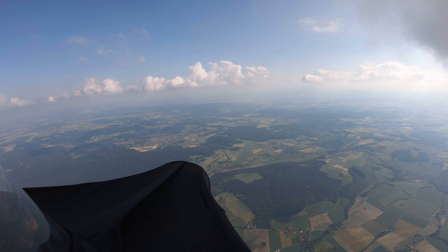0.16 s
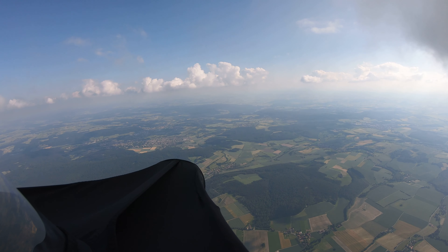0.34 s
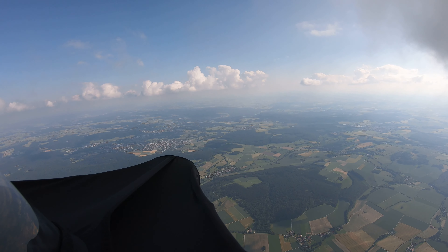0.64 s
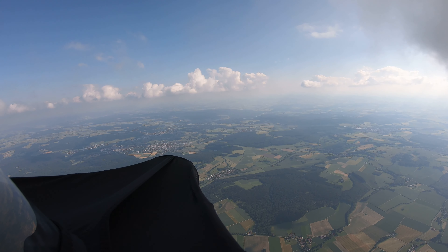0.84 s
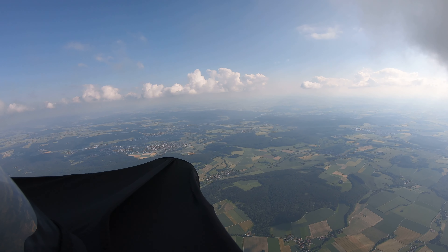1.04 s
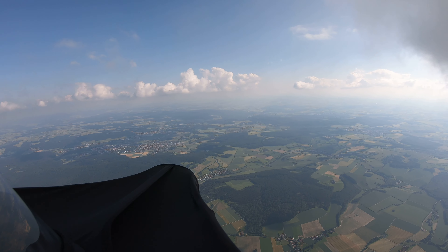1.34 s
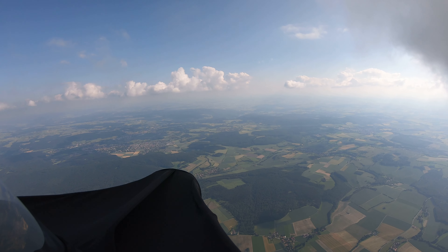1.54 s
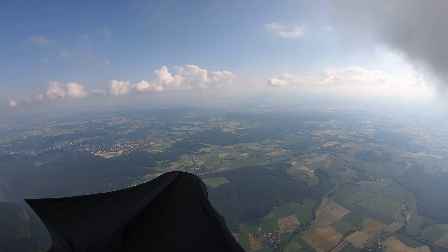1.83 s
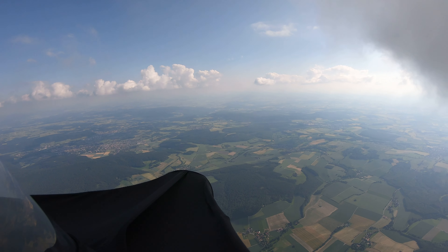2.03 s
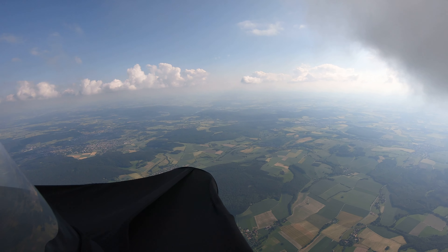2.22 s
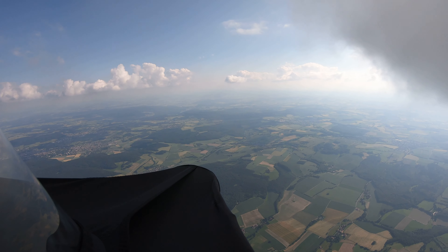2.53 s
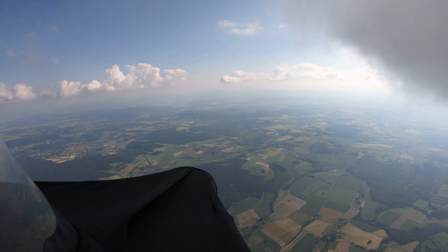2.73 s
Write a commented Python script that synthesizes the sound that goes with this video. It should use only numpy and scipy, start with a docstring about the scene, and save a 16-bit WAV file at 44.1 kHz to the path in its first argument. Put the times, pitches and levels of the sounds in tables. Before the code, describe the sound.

Wind rumbles unevenly against a small camera microphone in gliding flight, deep and close, with faint roar and dull hiss above. Flutter and small ticks lead to a strong gust at 0.6-0.8 s, a dense burst of thudding pops, with a barely audible rising whistle near 0.9 s. It eases around 1.2-1.6 s, then buffets again near 1.85 and 2.1 s, continuing as softer lumpy rumble to the end.

```python
"""A lumpy wind rumble with buffets and pops, under roar and hiss, at a small camera microphone in gliding flight.
Large eddies push the capsule, smaller ones buffet and pop across the port, and air roars round the housing.
Each airflow band is noise mixed with eddy impulses, filtered to a spectrum and swelled by a level curve.
Pops and ticks are short wave packets; a faint whistle is narrow noise on a gliding pitch."""
import sys
import numpy as np
from scipy import signal
from scipy.fft import rfft, irfft
from scipy.io import wavfile
from scipy.ndimage import uniform_filter1d

SR = 44100
rng = np.random.default_rng(int(sys.argv[2]) if len(sys.argv) > 2 else 0)


def store_wav(level_fs):
    """Save 16-bit WAV to argv[1]."""
    pcm = np.round(np.clip(np.atleast_2d(level_fs), -1, 1) * 32767)
    wavfile.write(sys.argv[1], SR, pcm.T.astype(np.int16))


N = 126567


def gain_of(db):
    """Decibel law: 20 dB is a tenfold amplitude."""
    return 10 ** (np.asarray(db) / 20)


def evened(x):
    """Normalisation: scales a signal to an rms of 1."""
    return x / np.sqrt(np.mean(x ** 2) + 1e-20)


def curve(table, column):
    """Linear interpolation: one column of a table of times, at every sample."""
    rows = np.array(table)
    return np.interp(np.arange(N) / SR, rows[:, 0], rows[:, column])


def coloured(x, spectrum):
    """Spectral shaping: weights each frequency by a table, at -120 dB outside it."""
    hz = np.fft.rfftfreq(N, 1 / SR)
    table_hz, table_db = np.transpose(spectrum)
    shape_db = np.interp(np.log(hz + 1), np.log(table_hz + 1), table_db, left=-120, right=-120)
    return evened(irfft(rfft(x) * gain_of(shape_db), N))


def lumps(per_s):
    """Random modulation: low-passed noise of rms 1, changing up to about per_s times a second."""
    hz = np.fft.rfftfreq(N, 1 / SR)
    low_pass = np.exp(-(hz / per_s) ** 2)
    tilt = hz / (hz + 5) / np.sqrt(hz + 5)  # removes the mean and favours slow changes
    return evened(irfft(rfft(rng.standard_normal(N)) * low_pass * tilt, N))


def eddy_train(per_s, spread_db):
    """Shot noise: sparse random suction impulses, uneven in size by spread_db."""
    size = gain_of(spread_db * np.minimum(rng.exponential(1, N), 4))
    return evened(-size * (rng.random(N) < per_s / SR))


def steadied(x, amount):
    """Gain control: evens out the chance swells of a narrow noise."""
    span = int(0.03 * SR)  # 30 ms, averaged twice
    power = uniform_filter1d(uniform_filter1d(x ** 2, span), span)
    return x / (abs(power) + 0.037) ** (amount / 2)


def airflow(spectrum, level_db, lumps_db, eddies, share, steady=0.):
    """Turbulence noise: noise plus eddy impulses, coloured, made lumpy and set to its level."""
    noise = np.sqrt(1 - min(share, 1) ** 2) * rng.standard_normal(N)
    band = coloured(noise + share * eddies, spectrum)
    lumpy = steadied(band, steady) * gain_of(lumps_db)
    return gain_of(level_db) * evened(lumpy)


def bursts(table):
    """Transient pressure pulses: each row is a Gaussian wave packet centred on a suction."""
    out, t = np.zeros(N), np.arange(N) / SR
    for centre_s, peak_db, hz, cycles in table:
        phase = (t - centre_s) * hz  # in cycles
        envelope = np.exp(-2 * (phase / cycles) ** 2)
        out -= gain_of(peak_db) * envelope * np.cos(2 * np.pi * phase)
    return out


# Relative spectra of the airflow noise, from treble to middle.
# Each row: frequency in Hz, density in dB per Hz.
HISS_SPECTRUM = [(4800, -18), (5800, -0.5), (6500, -2.5), (7500, -2.5), (8300, -5), (9000, -11.5),
                 (9800, -23.5), (10500, -35)]
FIZZ_SPECTRUM = [(1900, -26), (2500, -2.5), (3100, 0), (4300, -1.5), (5000, -6.5), (5700, -18),
                 (6500, -37.5)]
ROAR_SPECTRUM = [(900, -25), (1400, -5), (2000, -4.5), (2600, -9.5), (3200, -22.5), (4000, -34)]
RUSH_SPECTRUM = [(450, -5.5), (700, -5), (1000, -3), (1330, 1.5), (1420, -20), (1700, -50)]
SPRAY_SPECTRUM = [(450, -14.5), (700, 0), (1000, -5), (1400, -12), (2000, -20.5), (2800, -26.5),
                  (4000, -52)]
# Strength of the hiss. Each row: time in seconds, level in dB.
HISS_LEVEL_DB = [(0.05, -68.5), (1.57, -71), (1.75, -67.5), (1.82, -72), (2.42, -74), (2.86, -71),
                 (2.87, -80)]
# Strength of the rush. Each row: time in seconds, level in dB.
RUSH_LEVEL_DB = [(0, -49.5), (.6, -50), (.9, -50.5), (1.3, -54), (1.8, -49), (2.3, -52.5), (2.87, -57.5)]
# Strength of three bands. Each row: time in seconds, spray in dB, roar in dB, fizz in dB.
STREAM_LEVELS_DB = [(0.0, -41, -51, -58), (0.01, -51, -53.5, -53), (0.07, -47, -54.5, -59),
                    (0.45, -47, -53, -52.5), (0.49, -46, -55.5, -57.5), (0.65, -41.5, -47.5, -48.5),
                    (0.69, -32, -52, -52), (0.7, -38, -42.5, -44), (0.73, -39, -48, -50),
                    (0.8, -49, -50.5, -56), (0.81, -38, -56, -57.5), (0.89, -51, -55.5, -57.5),
                    (0.91, -42, -50, -55), (0.97, -47, -66, -58), (1.03, -39, -53, -53),
                    (1.06, -46.5, -59, -58.5), (1.07, -36, -60, -56), (1.1, -54, -57, -59),
                    (1.11, -41, -56, -56), (1.14, -54, -57, -57), (1.74, -50, -50, -52.5),
                    (1.76, -49, -51, -50), (1.79, -42, -50, -52.5), (1.82, -45, -54, -50),
                    (1.84, -40, -51, -54), (1.85, -43, -45, -53), (1.9, -41, -52, -52.5),
                    (2.02, -51, -52, -56), (2.07, -41.5, -51.5, -55.5), (2.21, -48, -54, -56),
                    (2.23, -46, -47, -54.5), (2.29, -48.5, -55, -55), (2.38, -45, -52, -57),
                    (2.41, -50.5, -56, -58), (2.57, -51, -52.5, -53), (2.61, -46.5, -51.5, -57),
                    (2.64, -62, -57, -56.5), (2.67, -46, -55.5, -54.5), (2.83, -44.5, -50.5, -52.5),
                    (2.87, -47, -51, -55)]


def housing_airflow(shared, eddies):
    """Broadband flow noise: the upper bands flicker with the fast turbulence by different amounts."""
    flicker, fine = lumps(per_s=220), eddy_train(per_s=270, spread_db=0.9)
    hiss = airflow(HISS_SPECTRUM, curve(HISS_LEVEL_DB, column=1),
                   0.8 * flicker + 0.97 * lumps(per_s=40), fine, share=0.15)
    fizz = airflow(FIZZ_SPECTRUM, curve(STREAM_LEVELS_DB, column=3),
                   0.42 * flicker + 0.74 * lumps(per_s=69), fine, share=0.54)
    roar = airflow(ROAR_SPECTRUM, curve(STREAM_LEVELS_DB, column=2),
                   0.11 * shared + 0.83 * flicker, fine, share=0.25)
    rush = airflow(RUSH_SPECTRUM, curve(RUSH_LEVEL_DB, column=1),
                   0.2 * shared + 0.52 * lumps(per_s=120), eddies, share=0.11)
    spray = airflow(SPRAY_SPECTRUM, curve(STREAM_LEVELS_DB, column=1),
                    1.4 * shared + 0.68 * flicker, eddies, share=0.2)
    return hiss + fizz + roar + rush + spray


# A faint fuzzy whistle as the strongest gust leaves the port.
# Each row: time in seconds, pitch in Hz, level in dB.
WHISTLE_GLIDE = [(.80, 380, -52), (.85, 469.5, -49), (.87, 480.4, -44), (.915, 519.5, -37.5),
                 (.924, 513, -61), (.926, 691, -58), (.935, 756, -49), (.955, 802, -36.5), (.98, 832, -59),
                 (.99, 850, -60)]


def whistle():
    """Frequency shifting: low-passed complex noise rides on a gliding carrier."""
    pole = np.exp(-np.pi * 38 / SR)  # each of the two poles is 38 Hz wide
    real, imaginary = rng.standard_normal((2, N))
    fuzz = real + 1j * imaginary
    for _ in range(2):
        fuzz = signal.lfilter([1 - pole], [1, -pole], fuzz)
    carrier = np.exp(2j * np.pi * np.cumsum(curve(WHISTLE_GLIDE, column=1)) / SR)
    return gain_of(curve(WHISTLE_GLIDE, column=2)) * evened((fuzz * carrier).real)


# Small ticks, mostly in the treble.
# Each row: centre in seconds, peak in dB, pitch in Hz, length in cycles.
TICK_EVENTS = [(.388, -41, 3460, 0.71), (.457, -30.5, 3200, 0.73), (.527, -38, 3350, 0.88),
               (.545, -32, 3960, 1.2), (.618, -33, 3900, 1.8), (.701, -26.5, 3200, 3.2),
               (1.02, -31, 2190, 0.6), (1.788, -31, 1530, 1.4), (1.846, -33, 1330, 1.1),
               (1.862, -33, 2100, 1.6), (2.034, -40.5, 3170, 3.6), (2.2005, -49, 6600, 3.6),
               (2.2345, -34, 3380, 0.89)]


def ticks():
    """Short transients: a packet of few cycles spreads over a wide band and is heard as a tick."""
    return bursts(TICK_EVENTS)


# Single eddies that pop on the port.
# Each row: centre in seconds, peak in dB, pitch in Hz, length in cycles.
POP_EVENTS = [(.128, -20, 507, 0.59), (.309, -22, 630, 1.4), (.547, -18, 560, 0.69),
              (.576, -22.5, 400, 0.99), (.608, -16.5, 400, 1.03), (.615, -9, 250, 0.72),
              (.653, -22, 600, 1), (.6835, -9.5, 330, 0.6), (.697, -25, 900, 1.2), (.711, -27.5, 990, 1.9),
              (.7015, -8, 190, 0.9), (.7175, -9, 200, 0.64), (.7275, -10.5, 480, 0.58),
              (.7405, -9.5, 330, 0.73), (.746, -14.5, 600, 0.89), (.762, -9.5, 220, 0.56),
              (.777, -15, 500, 0.88), (.806, -15, 400, 1.06), (.828, -26, 900, 1.5), (.860, -20, 600, 0.99),
              (.937, -29, 760, 2.1), (.994, -17.5, 600, 0.59), (1.073, -25.5, 600, 0.38),
              (1.107, -23, 450, 0.52), (1.116, -31, 950, 1.5), (1.322, -31, 480, 1.3),
              (1.655, -27.5, 400, 1), (1.766, -26.5, 650, 0.63), (1.8375, -21.5, 620, 3),
              (1.840, -18, 317, 0.67), (1.8435, -13.5, 300, 0.58), (2.074, -23, 480, 0.72),
              (2.087, -19, 350, 0.33), (2.097, -25, 300, 0.98), (2.118, -14, 240, 0.85),
              (2.228, -35.5, 750, 4.1), (2.329, -29, 300, 0.59), (2.515, -22, 453, 0.5)]


def pops():
    """Eddy suction: each passing eddy pulls on the port in a brief low packet."""
    return bursts(POP_EVENTS)


# Relative spectra of the low bands. Each row: frequency in Hz, density in dB per Hz.
FLUTTER_SPECTRUM = [(150, -35), (260, -1), (422, -6), (553, -10), (748, -21), (1000, -27), (1400, -33.5),
                    (2000, -41.5), (4300, -51), (5500, -55.5), (6500, -120)]
BUFFET_SPECTRUM = [(53, -42.5), (90, -11.5), (130, 1), (320, -17.5), (420, -39), (700, -120)]
RUMBLE_SPECTRUM = [(7.1, -40), (12, -6), (54, 6.5), (97, 0.5), (130, -10.5), (170, -36.5), (290, -120)]
# Strength of the flutter. Each row: time in seconds, level in dB.
FLUTTER_LEVEL_DB = [(0, -34.5), (.1, -38), (.13, -36), (.17, -39), (.24, -33), (.29, -37.5), (.44, -36.5),
                    (.51, -41), (.55, -36), (.59, -41), (.61, -29), (.65, -27.5), (.7, -24.5), (.76, -27),
                    (.81, -25), (.84, -39.5), (.88, -40.5), (.97, -50), (1.0, -36), (1.07, -34.5),
                    (1.12, -42.5), (1.16, -44.5), (1.29, -46.5), (1.37, -45.5), (1.4, -36), (1.44, -44.5),
                    (1.57, -48), (1.64, -45), (1.73, -44.5), (1.77, -35.5), (1.82, -36), (1.85, -32),
                    (1.92, -36), (2.02, -43), (2.09, -32.5), (2.16, -33.5), (2.21, -42), (2.25, -36),
                    (2.35, -40), (2.45, -39.5), (2.52, -37), (2.6, -40.5), (2.68, -41), (2.72, -36),
                    (2.8, -38), (2.87, -35.5)]
# Strength of the buffeting gusts. Each row: time in seconds, level in dB.
BUFFET_LEVEL_DB = [(0.0, -29.5), (0.04, -26), (0.11, -38.5), (0.13, -28.5), (0.25, -27), (0.28, -35),
                   (0.33, -27), (0.52, -31), (0.55, -25), (0.58, -28.5), (0.61, -18), (0.65, -21),
                   (0.71, -14), (0.8, -27.5), (0.84, -26.5), (0.87, -41), (1.08, -24), (1.15, -33.5),
                   (1.3, -36), (1.34, -45), (1.37, -38), (1.41, -27), (1.43, -42), (1.57, -31.5),
                   (1.64, -37), (1.77, -25.5), (1.8, -33.5), (1.84, -21.5), (1.86, -27), (1.98, -31),
                   (2.04, -41), (2.08, -25.5), (2.12, -27), (2.19, -32), (2.25, -24.5), (2.3, -31),
                   (2.32, -28.5), (2.49, -31.5), (2.57, -28.5), (2.58, -24.5), (2.68, -35), (2.72, -24),
                   (2.79, -25), (2.87, -27.5)]
# Strength of the rumble. Each row: time in seconds, level in dB.
RUMBLE_LEVEL_DB = [(0.0, -24.5), (0.08, -28), (0.45, -20), (0.47, -34), (0.49, -20.5), (0.69, -18),
                   (0.71, -15.5), (0.77, -28), (0.79, -28), (0.99, -28.5), (1.03, -19.5), (1.15, -26.5),
                   (1.19, -24), (1.37, -29), (1.41, -20), (1.46, -29.5), (1.59, -27.5), (1.61, -19.5),
                   (1.65, -43.5), (1.71, -15.5), (1.74, -38), (1.77, -20), (1.81, -30), (1.85, -18),
                   (1.96, -28), (2.05, -28.5), (2.07, -18.5), (2.1, -29), (2.29, -26), (2.45, -29),
                   (2.53, -23.5), (2.57, -27), (2.59, -22), (2.67, -27.5), (2.85, -26), (2.87, -45)]


def eddy_pressure(shared, eddies):
    """Turbulent pressure: large eddies rumble on the capsule, smaller ones buffet and flutter."""
    flutter = airflow(FLUTTER_SPECTRUM, curve(FLUTTER_LEVEL_DB, column=1),
                      2.3 * shared + 0.9 * lumps(per_s=66), eddies, share=0.098, steady=0.45)
    buffet = airflow(BUFFET_SPECTRUM, curve(BUFFET_LEVEL_DB, column=1),
                     1.7 * shared + 0.69 * lumps(per_s=90), eddies, share=0.25, steady=0.53)
    rumble = airflow(RUMBLE_SPECTRUM, curve(RUMBLE_LEVEL_DB, column=1),
                     0.1 * shared + 1.0 * lumps(per_s=8), eddies, share=0.2, steady=0.95)
    return flutter + buffet + rumble


def scene():
    """Superposition: all pressures add at one microphone, and the bands share one turbulence."""
    shared, eddies = lumps(per_s=36), eddy_train(per_s=68, spread_db=5.2)
    flow = housing_airflow(shared, eddies) + eddy_pressure(shared, eddies)
    return (flow + whistle() + ticks() + pops())[None]


def record(dry):
    """Saturation and band limiting: the capsule rounds strong pushes, the recorder cuts the top."""
    overload, edge_hz = 0.7, 10600  # overload is the ceiling, in full scale
    rounded = overload * np.tanh(dry / overload)
    low_pass = signal.firwin(511, edge_hz, window=("kaiser", 9), fs=SR)
    return signal.oaconvolve(rounded, low_pass[None], "same")


dry = scene()
out = record(dry)
store_wav(out)
```